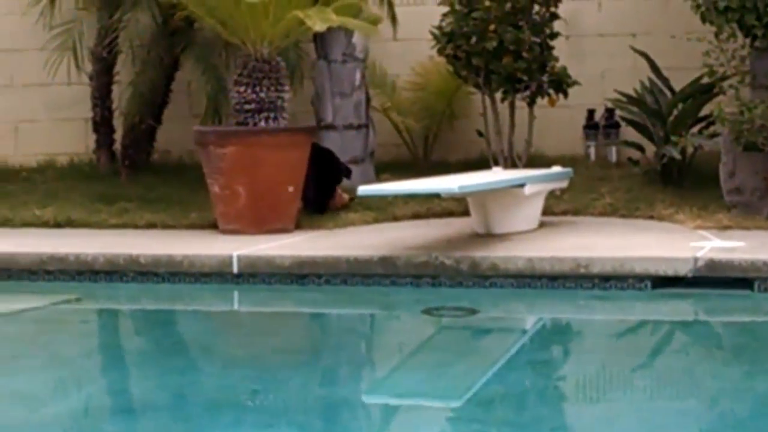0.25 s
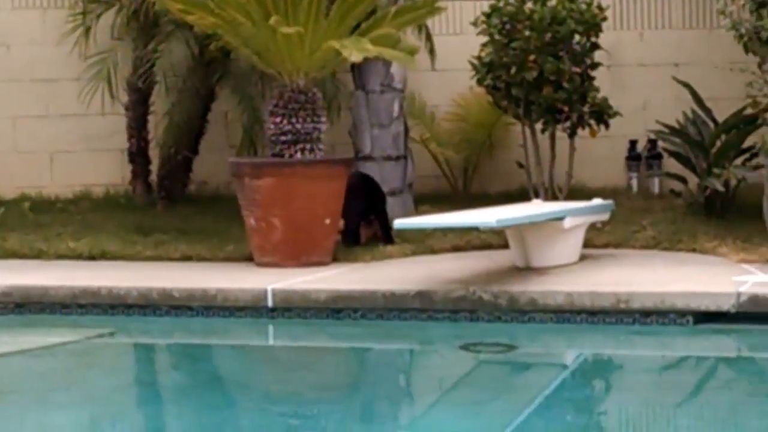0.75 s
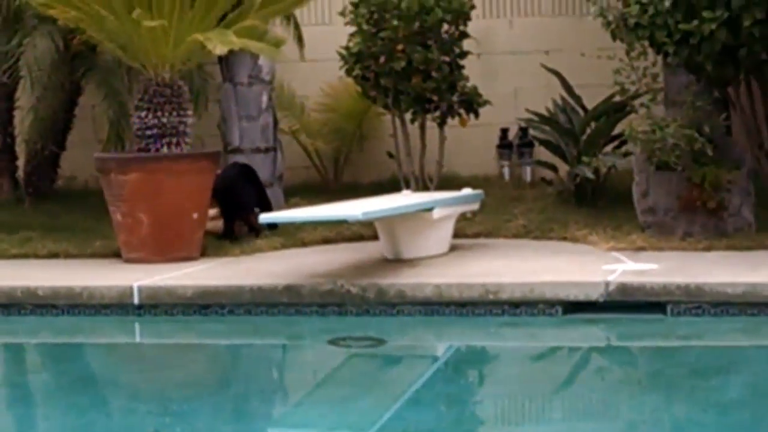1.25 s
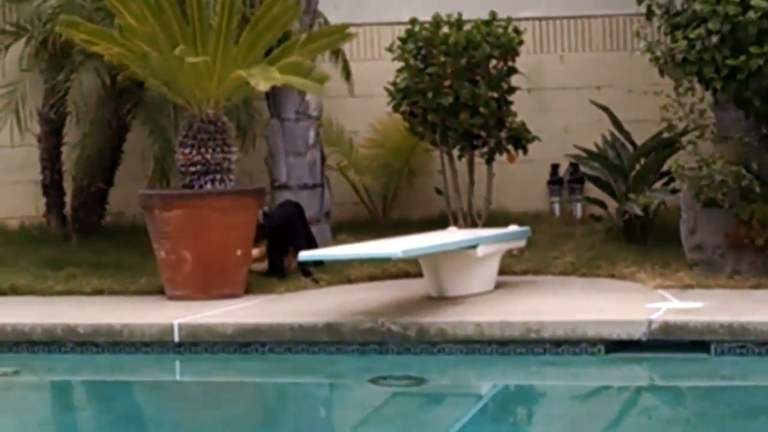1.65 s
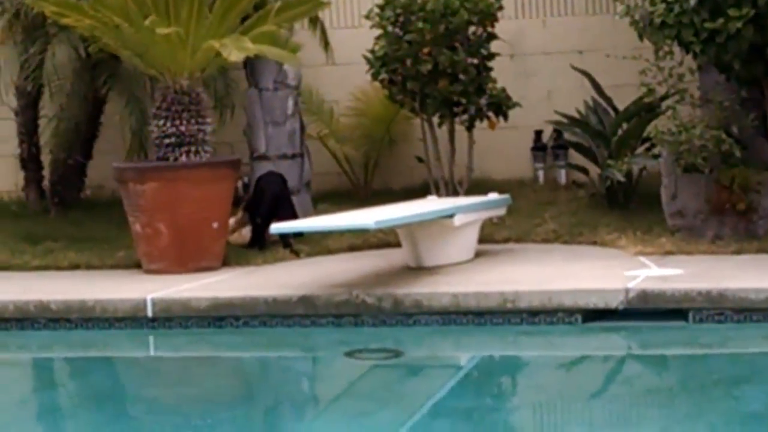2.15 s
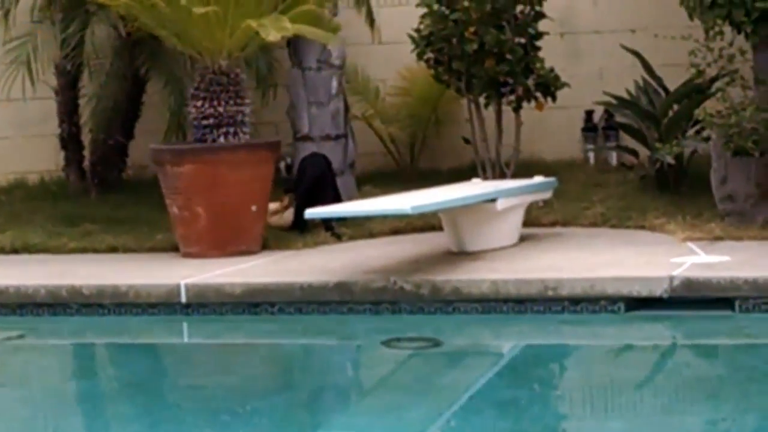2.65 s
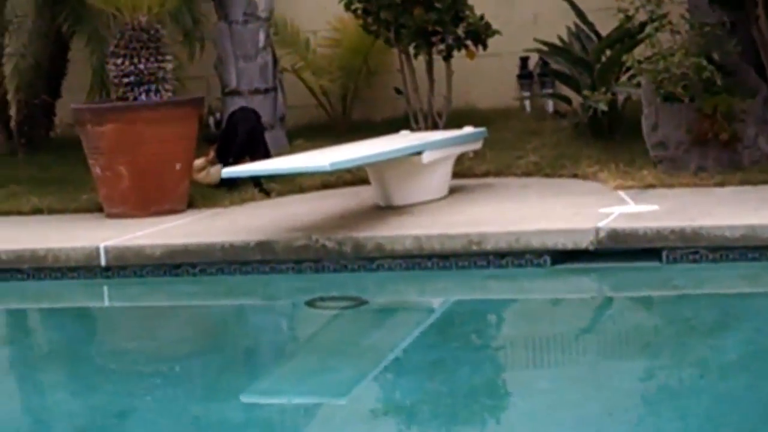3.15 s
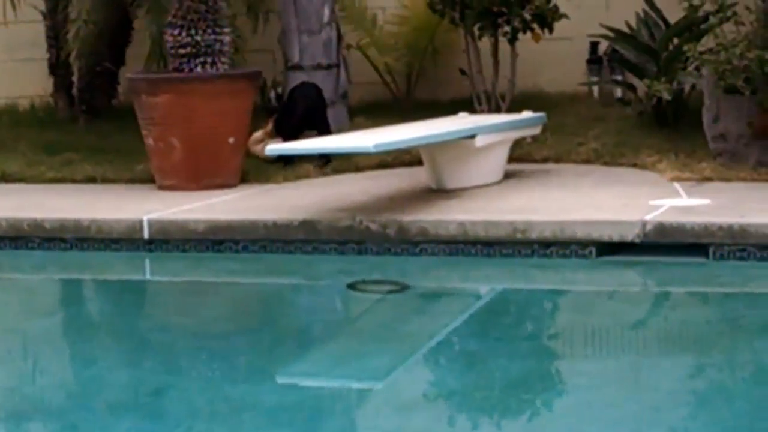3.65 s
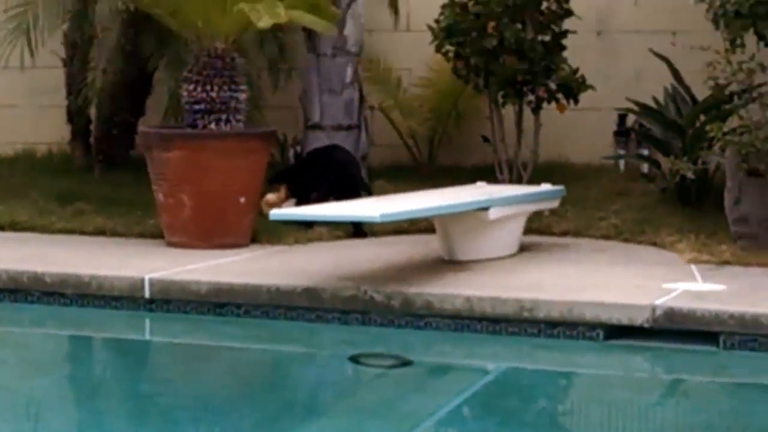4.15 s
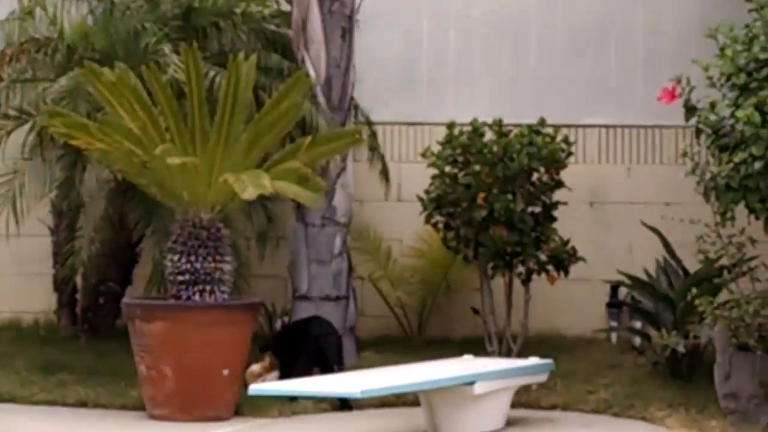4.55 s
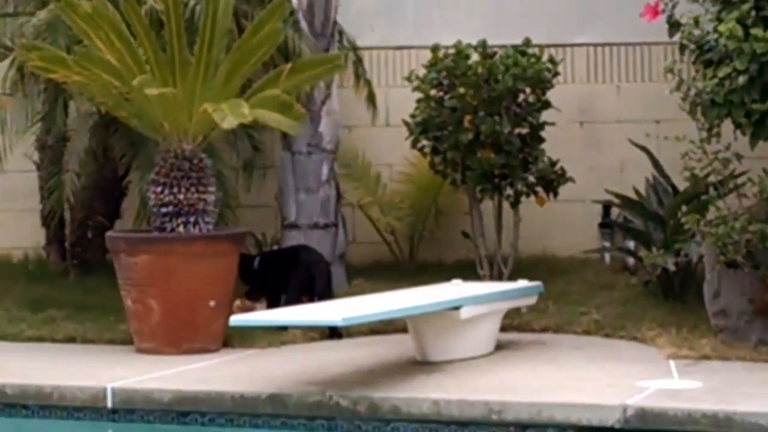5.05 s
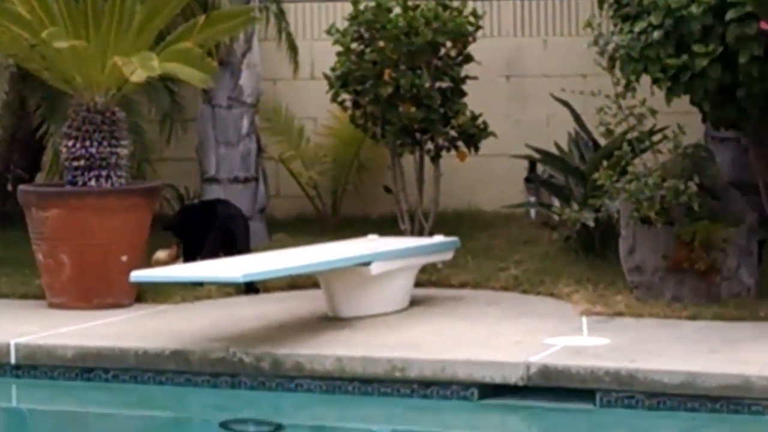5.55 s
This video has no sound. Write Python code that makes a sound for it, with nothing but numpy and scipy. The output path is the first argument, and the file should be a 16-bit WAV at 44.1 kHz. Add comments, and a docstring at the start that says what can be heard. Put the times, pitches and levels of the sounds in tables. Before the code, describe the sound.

A steady low pool pump hum with trickling, ticking water, while a propeller plane's drone slowly grows closer over a walled yard.

```python
"""A pool pump hums in a walled yard while a propeller plane drones closer overhead.
The pump is steady sines; the plane is engine orders on a sinking shaft speed, over a roar.
Water hisses, gurgles, ticks and bubbles at the skimmer, from shaped noise and short rings.
A small camera hears it through two ports and subtracts a delayed copy of each from the other."""
import sys
import numpy as np
from scipy import signal
from scipy.io import wavfile
from scipy.ndimage import uniform_filter1d

SR = 44100
rng = np.random.default_rng(int(sys.argv[2]) if len(sys.argv) > 2 else 0)


def store_wav(level_fs):
    """Save 16-bit WAV to argv[1]."""
    pcm = np.round(np.clip(np.atleast_2d(level_fs), -1, 1) * 32767)
    wavfile.write(sys.argv[1], SR, pcm.T.astype(np.int16))


N = 255339


def gain_of(db):
    """Decibels to an amplitude factor."""
    return 10 ** (np.asarray(db) / 20)


def evened(x):
    """Scales to rms 1."""
    return x / np.sqrt(np.mean(x ** 2) + 1e-20)


def read(points, hz):
    """Reads a spectrum table on a log frequency axis."""
    f, value = np.transpose(points)
    return np.interp(np.log(hz + 1), np.log(f + 1), value)


def curves(rows):
    """Every column of a time table at every sample."""
    s, *columns = np.transpose(rows)
    return [np.interp(np.arange(N) / SR, s, c) for c in columns]


def wander(seconds):
    """Smoothed random drift of rms 1."""
    size = round(seconds * SR)
    once = uniform_filter1d(rng.standard_normal(N), size=size)
    return evened(uniform_filter1d(once, size=size // 2))


def tone(turns, db, pan_db, lead_rad):
    """A sine of rms db over both ports, leaning by pan_db, the left phase ahead by lead_rad."""
    side = np.array([[.5], [-.5]])
    lean = gain_of(side * pan_db)
    lean = lean / np.sqrt((lean ** 2).mean(0))
    phase = 2 * np.pi * (turns + rng.random()) + side * lead_rad
    return np.sqrt(2) * gain_of(db) * lean * np.sin(phase)


# Likeness of noise at the two ports. Each row: frequency in Hz, correlation from -1 to 1.
PORT_LIKENESS = [(25, -0.85), (50, -0.19), (90, 0.62), (160, 0.44), (300, 0.35), (550, 0.82), (900, 0.64),
                 (1400, 0.6), (2400, 0.000085), (4000, -0.44), (6000, 0.38), (15000, -0.18)]
# Noise reaches the left port later, varying as the camera turns. Each row: time in s, lag in ms.
LEFT_LAG = [(0, 0.25), (3.3, 0.21), (5.0, 0.25), (5.79, 0.23)]


def noise(colour, size, patchy_db):
    """Random short-time spectra in drifting patches, partly alike at the two ports, rms 1."""
    hop = size // 4
    hz, frames = np.fft.rfftfreq(size, 1 / SR), N // hop + 5
    a, b, c, d, patches = rng.standard_normal((frames, len(hz), 5)).T
    patches = uniform_filter1d(patches, size=6, axis=0)
    patches = evened(uniform_filter1d(patches, size=10, axis=1))
    lag_s = np.interp(np.arange(frames) * hop / SR, *np.transpose(LEFT_LAG)) / 1000
    same = np.clip(read(PORT_LIKENESS, hz), -1, 1)[:, None]
    left = a + 1j * b
    early = left * np.exp(2j * np.pi * hz[:, None] * lag_s)
    right = same * early + np.sqrt(1 - same ** 2) * (c + 1j * d)
    z = np.array([left, right]) * gain_of(colour(hz)[:, None] + patchy_db * patches)
    return evened(signal.istft(z, nperseg=size, noverlap=3 * hop)[1][:, :N])


BUZZ_HZ, IMPELLER_HZ = 120.0, 174.45  # the buzz, at twice the 60 Hz mains, and the impeller tone
# Buzz, then impeller, swelling as the camera turns.
# Each row: mean level in dB, swing in dB, period in s, loudest moment in s.
PUMP_SWELLS = [(-51, 1, 6.7, 4.8), (-45, 3, 4.7, 4.18)]
# Left phase lead in rad of buzz and impeller.
PUMP_LEADS_RAD = [0.87, -0.43]
# Stereo lean of the two tones. Each row: time in s, left over right in dB.
BUZZ_LEAN = [(0, 13), (1.5, 11.5), (3.3, -7), (4.6, -6), (5.79, 28)]
IMPELLER_LEAN = [(0, -0.5), (0.7, 0.5), (1.75, -22), (2.5, 3), (3.6, -11), (4.4, -2), (5.79, 7)]
# Fainter hum tones of steady pitch. Each row: frequency in Hz, mean level in dB, left over right in dB.
FAINT_HUM_TONES = [(240, -65, -2), (345.6, -65, 0), (348.9, -64, -4), (360, -66, 2), (523.4, -68, 3),
                   (600, -66.5, -2), (692, -69, 0), (1037.6, -77, 0)]


def pump():
    """Magnetic buzz at twice the mains, the impeller tone, and fainter wavering hum tones."""
    t, out = np.arange(N) / SR, 0
    pitches, leans = (BUZZ_HZ, IMPELLER_HZ), (BUZZ_LEAN, IMPELLER_LEAN)
    for hz, swell, lean, lead_rad in zip(pitches, PUMP_SWELLS, leans, PUMP_LEADS_RAD):
        mean_db, swing_db, period_s, loudest_s = swell
        level_db = mean_db + swing_db * np.cos(2 * np.pi * (t - loudest_s) / period_s)
        out = out + tone(hz * t, level_db, curves(lean)[0], lead_rad)
    for hz, db, pan_db in FAINT_HUM_TONES:
        out = out + tone(hz * t, db + 0.9 * wander(0.52), pan_db, 0.19)
    return out


# Approach of the plane. Each row: time in s, nearness from 0 far to 1 near.
NEARNESS = [(0, 0.012), (2.9, 0.095), (3.4, 0.2), (4.0, 0.36), (4.3, 0.62), (4.6, 0.98), (4.9, 0.99),
            (5.79, 0.97)]


def nearness():
    """How near the plane is at every sample, 0 to 1."""
    return curves(NEARNESS)[0]


SHADOW_ORDER = 4.7  # the wall hides higher orders longer: nearness to the power order / this
AIR_WAVER_DB, AIR_WAVER_S = 1.2, .15  # moving air makes every order waver
AIR_FLUTTER_DB, AIR_FLUTTER_S, STEADY_ORDER = 0.16, .05, 9.0  # dB per order above the steady ones


def order_level_db(order, far_db, near_db, echo, period_s, faintest_s):
    """One order rises past the wall, wavers in the air and beats with its ground and wall echo."""
    t = np.arange(N) / SR
    approach_db = far_db + near_db * nearness() ** (order / SHADOW_ORDER)
    waver_db = AIR_WAVER_DB * wander(AIR_WAVER_S)
    flutter_db = AIR_FLUTTER_DB * max(order - STEADY_ORDER, 0) * wander(AIR_FLUTTER_S)
    beat = abs(1 - min(echo, .9) * np.exp(2j * np.pi * (t - faintest_s) / period_s))
    return approach_db + waver_db + flutter_db + 20 * np.log10(beat)


# Plane speed. Each row: time in s, half shaft speed in Hz (the pitch of order 1).
HALF_SHAFT = [(0, 22.99), (1.5, 23.14), (3, 22.97), (4.1, 22.82), (5, 22.75), (5.79, 22.67)]
# Order levels. Each row: order, far level in dB, gain at nearness 1 in dB, echo share (capped at 0.9),
# beat period in s, faintest moment in s.
ORDER_LEVELS = [(4, -61.5, 14.5, 0.21, 3.8, 2.3), (6, -50, 12, 0.69, 6.17, 1.1), (8, -51, 8, 0.42, 3, 3.53),
                (9, -52.5, 5, 0.51, 3.3, 0.65), (12, -59.5, -4, 0.92, 4.3, 3.63),
                (15, -59, 0, 0.38, 2.6, 3.4), (16, -56.5, 8.5, 0.51, 2.43, 0.91),
                (20, -65.5, 16.5, 0.38, 0.74, 5.24)]
# Order images, row for row with the levels. Each row: order, left over right in dB at start and end,
# left phase lead in rad at start and end.
ORDER_IMAGES = [(4, 7, 0.5, 1.2, -0.4), (6, -12, 4, 1.5, -0.8), (8, -4, 1, 1.5, -1.4), (9, 5, 3, 2, -6),
                (12, 5, 6, 0, -2), (15, -3, 1, -2.2, 3.5), (16, -9, -1, 0.6, -2.6), (20, -3, 10, -3.5, 2)]
# Faint orders following the level of the 20th. Each row: order, level in dB relative to the 20th.
FAINT_ORDERS = [(18, -9), (19, -24), (22, -16), (23, -12), (24, -13.5), (26, -18), (28, -11)]
# Roar spectrum. Each row: frequency in Hz, level in dB.
ROAR_COLOUR = [(20, -14), (50, -8), (75, -7.5), (110, -7.5), (160, -5), (220, -12), (300, -7.5),
               (550, -12.5), (900, -19.5), (1400, -26.5), (3000, -33.5)]
ROAR_DB, ROAR_NEAR_DB, ROAR_GUST_DB, ROAR_GUST_S = -47.5, 3.5, 1, 0.28


def plane():
    """Engine and propeller orders sink with the Doppler shift and cross the image; air roar under them."""
    levels_db = [order_level_db(*row) for row in ORDER_LEVELS]
    turns, way = np.cumsum(curves(HALF_SHAFT)[0]) / SR, np.linspace(0, 1, N)
    out = 0
    for (order, pan0, pan1, lead0, lead1), db in zip(ORDER_IMAGES, levels_db):
        out = out + tone(order * turns, db, pan0 + (pan1 - pan0) * way, lead0 + (lead1 - lead0) * way)
    for order, db in FAINT_ORDERS:
        out = out + tone(order * turns, levels_db[-1] + db + 1.5 * wander(0.089), 2.1, 0.94)
    roar_db = ROAR_DB + ROAR_NEAR_DB * nearness() + ROAR_GUST_DB * wander(ROAR_GUST_S)
    return out + gain_of(roar_db) * noise(lambda f: read(ROAR_COLOUR, f), size=2048, patchy_db=1.85)


# Running water. Each row: time in s, hiss level in dB.
FLOW = [(0, -58.5), (1.9, -60), (2.35, -54), (2.8, -55), (4.0, -54), (5.2, -59), (5.79, -52)]
# Hiss spectrum. Each row: frequency in Hz, level in dB.
HISS_COLOUR = [(300, -24), (900, -2.5), (1400, -1), (2100, 1), (3000, 0.5), (4300, -3), (7000, -5.5),
               (11500, -6.5), (15000, -10.5)]
# Sudden changes of the hiss that drain away.
# Each row: start in s, level over the flow in dB (negative dips), fading time in s.
SPLASHES = [(0.728, 5.5, 0.14), (1.252, 8, 0.037), (1.47, 5, 0.13), (1.6, 10, 0.057), (1.76, 8, 0.21),
            (2.13, 6.5, .03), (2.216, 3, .003), (2.33, 5, 0.12), (3.35, 2, 0.011), (3.467, -8, 0.013),
            (4.2, 3.5, 0.16), (4.765, 11, 0.11), (5.115, 14, 0.029), (5.18, 8.5, 0.052), (5.38, 13, 0.031)]


def hiss():
    """Broadband flow noise that flickers; splashes shift its level at once and drain away."""
    t = np.arange(N) / SR
    splash_db = sum(db * (t >= s) * np.exp(-abs(t - s) / fade_s) for s, db, fade_s in SPLASHES)
    quick_db = 1.9 * evened(uniform_filter1d(rng.standard_normal(N), size=600))
    level_db = curves(FLOW)[0] + splash_db + quick_db + 1.4 * wander(0.1)
    return gain_of(level_db) * noise(lambda f: read(HISS_COLOUR, f), size=256, patchy_db=1.5)


# Low and high gurgle bands. Each row: centre in Hz, width in Hz.
GURGLE_BANDS = [(2090, 410), (3450, 1540)]
# Gurgle levels. Each row: time in s, low band in dB, high band in dB.
GURGLING = [(0, -70, -55.5), (0.25, -66, -62.5), (0.45, -77, -56.5), (0.68, -62, -59), (0.8, -64, -62),
            (0.97, -64, -57.5), (1.15, -63, -64.5), (1.45, -66, -56.5), (1.6, -61, -55.5),
            (1.72, -71, -66.5), (1.8, -70, -53), (1.9, -58, -67), (2.1, -60.5, -57), (2.27, -58.5, -59.5),
            (2.45, -56, -65.5), (2.75, -61, -61.5), (3.1, -66, -70.5), (4.1, -76, -65), (4.3, -64, -70),
            (4.7, -68, -57), (4.86, -62, -59), (4.95, -64, -60), (5.22, -59.5, -71), (5.33, -61, -56.5),
            (5.47, -57, -69), (5.55, -46, -56), (5.64, -61, -73), (5.71, -50.5, -71), (5.79, -52, -63)]
GURGLE_LUMP_DB, GURGLE_LUMP_S = 1.5, 0.072


def gurgles():
    """Two resonant bands of lumpy noise where the skimmer gurgles."""
    out = 0
    for (hz, width_hz), db in zip(GURGLE_BANDS, curves(GURGLING)):
        level_db = db + GURGLE_LUMP_DB * wander(GURGLE_LUMP_S)
        band = noise(lambda f: -20 * np.log10(1 + (2 * (f - hz) / width_hz) ** 2), size=512, patchy_db=3.0)
        out = out + gain_of(level_db) * band
    return out


def breeze(db=-62, top_hz=45):
    """Lumpy air pressure on the ports, far down in the bass."""
    def colour(f):
        return -20 * np.log10(1 + (f / top_hz) ** 2 + (12 / (f + 1)) ** 2)
    return gain_of(db) * noise(colour, size=4096, patchy_db=3.5)


# A thin high tone, perhaps a far bird. The row: start in s, level in dB, frequency in Hz, length in s.
PEEP = (0.004, -58, 3195, 0.06)


def peep():
    """One short whistle of steady pitch."""
    s, db, hz, length_s = PEEP
    t = np.arange(N) / SR
    shape = np.sin(np.pi * np.clip((t - s) / length_s, 0, 1)) ** 0.28
    return shape * tone(hz * t, db, 0, 0)


def drip(hz, width_hz, length_s, crack=0.17):
    """A puff rings around hz on a wide crack: partials start nearly together, then scatter to a tail."""
    t = np.arange(2000) / SR
    jitter, phases = rng.uniform(-1.21, 1, (2, 16, 1))
    shifts = np.linspace(-1, 1, 16)[:, None] + jitter / 7
    turns = (hz + 1.4 * width_hz * shifts) * t
    partials = np.exp(-2 * shifts ** 2) * np.sin(2 * np.pi * turns + .8 * phases)
    snap = crack * np.diff(rng.standard_normal(len(t) + 1)) * np.exp(-t / min(length_s, .003))
    start = 1 - np.exp(-t / max(.0002, length_s / 6))  # longer drips start softer
    decay = np.exp(-t / length_s) + 0.073 * np.exp(-t / 0.057)
    return (partials.sum(0) / 2 + snap) * start * decay


# Loudest ticks and drips. Each row: start in s, level in dB, centre in Hz, width setting in Hz,
# decay time in s.
DROPS = [(0.7268, -34, 4300, 1480, 0.0012), (0.7295, -41, 4400, 700, 0.0046),
         (0.7375, -43, 4200, 810, 0.003), (1.388, -45.5, 3850, 596, 0.0092),
         (1.474, -44, 13930, 1910, 0.006), (1.7505, -33, 8900, 890, 0.0017),
         (1.626, -44, 13900, 900, 0.002), (2.126, -46, 14200, 900, 0.004), (2.127, -55, 3700, 452, 0.012),
         (2.2162, -31, 13800, 1300, 0.0009), (2.217, -44, 8000, 3050, 0.00066),
         (2.2202, -37, 14300, 1200, 0.0015), (2.228, -48, 14300, 1200, 0.0012),
         (2.335, -45, 13800, 2240, 0.017), (2.72, -43, 2750, 362, 0.0042), (2.823, -56, 3800, 720, 0.0039),
         (2.866, -45, 9400, 880, 0.0028), (3.223, -35.5, 14110, 1384, 0.003),
         (3.293, -45, 9510, 528, 0.0026), (3.353, -49, 3880, 448, 0.007),
         (3.468, -41.5, 9470, 1000, 0.0028), (3.469, -41, 2980, 500, 0.0057),
         (3.47, -51, 5950, 1500, 0.004), (3.814, -42, 14000, 1392, 0.003), (4.197, -40, 4300, 1310, 0.004),
         (4.262, -44.5, 990, 120, 0.013), (4.265, -47, 3980, 500, 0.008), (4.574, -36.5, 2130, 530, 0.0027),
         (4.68, -49.5, 1780, 60, 0.016), (4.843, -37, 3960, 300, 0.014), (5.149, -37, 4840, 870, 0.0058),
         (5.183, -38, 13600, 2500, 0.004), (5.383, -50, 10300, 1220, 0.0037),
         (5.418, -59, 2100, 362, 0.0031), (5.45, -53, 2740, 520, 0.0034), (5.522, -48, 2150, 200, 0.015),
         (5.523, -52, 1530, 80.6, 0.015)]


def drops(per_s=45, small_db=-66, spread_db=5.0, left_db=-4):
    """Loud drops among many small ones; each is weaker at the left port and up to 11 samples late."""
    chance = rng.random((round(per_s * N / SR), 4))
    small = [(N / SR * u, small_db - spread_db * np.log(v + 0.0012), 650 * 22 ** w, 500,
              0.00038 + 0.0015 * z) for u, v, w, z in chance]
    out = np.zeros((2, N + 2100))
    for s, db, hz, width_hz, length_s in list(DROPS) + small:
        at, sound = round(s * SR), gain_of(db) * drip(hz, width_hz, length_s)
        late = at + rng.integers(0, 12)
        out[1, at:at + len(sound)] += sound
        out[0, late:late + len(sound)] += gain_of(left_db) * sound
    return out[:, :N]


# Large bubbles. Each row: start in s, level in dB, upper pitch in Hz, a third of the duration in s.
BUBBLES = [(0.355, -44.5, 665, 0.014), (0.769, -50.5, 915, 0.012), (0.937, -52, 1013, 0.008),
           (1.314, -55, 320, 0.037), (2.676, -56, 1400, 0.013), (3.116, -54.5, 1590, 0.014),
           (3.467, -53, 717, 0.017), (4.745, -53, 1012, 0.017), (4.956, -46, 397, 0.029),
           (5.507, -48, 1000, 0.0088)]


def bubbles(per_s=30, small_db=-64, spread_db=3):
    """Air pockets swell and burst, two near pitches beating; a few large ones among many small."""
    out, t = np.zeros(N + 4000), np.arange(4000) / SR
    chance = rng.random((round(per_s * N / SR), 4))
    small = [(N / SR * u, small_db - spread_db * np.log(v + 0.043), 600 * 3.5 ** w,
              0.0033 + 0.0077 * z) for u, v, w, z in chance]
    for s, db, hz, third_s in list(BUBBLES) + small:
        shape = np.sin(np.pi * np.clip(t / (3 * third_s), 0, 1) ** 0.74)
        ring = np.sin(2 * np.pi * hz * t) + .5 * np.sin(2 * np.pi * hz * 0.96 * t)
        out[round(s * SR):][:len(t)] += gain_of(db) * shape * ring
    return out[:N] * np.ones((2, 1))


def scene():
    """Everything as it reaches the two ports."""
    return pump() + plane() + hiss() + gurgles() + breeze() + peep() + drops() + bubbles()


def roll_off(x):
    """The treble ends steeply here."""
    return signal.sosfilt(signal.butter(12, 15660, fs=SR, output="sos"), x)


# The body colours the left port's treble. Each row: frequency in Hz, gain in dB.
LEFT_PORT = [(4000, 0), (6500, 3), (9000, -0.5), (14000, 0.5)]
# Cross-subtraction. Each row: frequency in Hz, share of the other port before depth and unevenness.
CROSS_SHARE = [(300, 0), (600, .4), (1200, .8), (2400, .95), (3900, .8), (5200, .5), (6500, .45),
               (7800, .45), (10400, .46), (13000, .67), (14300, .5)]
# Thinned bands in the hiss. Each row: time in s, depth factor, centre of the lowest band in Hz.
THINNED_BANDS = [(0, 1.0, 2480), (0.2, 1.08, 2470), (0.6, 1.0, 2530), (1.3, 1.06, 2500), (1.6, 0.95, 2480),
                 (1.9, 1.02, 2500), (2.15, 0.85, 2580), (2.35, 1.0, 2620), (2.55, 0.9, 2600),
                 (2.85, 0.9, 2560), (3.05, 1.0, 2460), (3.3, 1.08, 2570), (3.5, 0.97, 2500),
                 (3.75, 1.08, 2500), (4.15, 1.08, 2350), (4.3, 1.02, 2560), (4.6, 0.95, 2480),
                 (4.83, 1.1, 2580), (4.93, 1.08, 2400), (5.05, 0.9, 2450), (5.19, 1.1, 2580),
                 (5.35, 0.9, 2620), (5.79, 0.95, 2640)]
CROSS_SAMPLES = 17
UNEVEN_SHARE, UNEVEN_RAD = .24, .32  # random unevenness in depth and place of the thinned bands
SLIDE_REACH_HZ, WIDENING = 800, 2.6  # reach of the lowest band's slide; it widens as it deepens
TOP_HZ = 15700


def record(dry):
    """The body colours the left port; above the bass each side loses a delayed copy of the other."""
    hz, t, z = signal.stft(dry, SR, nperseg=512, noverlap=384)
    z = z * np.array([gain_of(read(LEFT_PORT, hz)), np.ones(len(hz))])[..., None]
    uneven = rng.standard_normal((z.shape[2], len(hz), 2)).T
    uneven = uniform_filter1d(uniform_filter1d(uneven, size=20, axis=1), size=18, axis=2)
    depth, place = evened(uneven[0]), evened(uneven[1])
    s, factor, centre = np.transpose(THINNED_BANDS)
    factor_now = np.interp(t, s, factor)
    f = hz[:, None]
    first_hz = SR / CROSS_SAMPLES  # lowest thinned band of the plain delay
    off_hz = f - np.interp(t, s, centre)
    narrow = np.clip(1 - WIDENING * (factor_now - factor.min()), .2, 1)
    # extra phase turns move the lowest band to its centre
    slide = np.exp(-(off_hz / SLIDE_REACH_HZ) ** 2) * (1 + (narrow * off_hz - f) / first_hz)
    calm = 1 - .5 * np.exp(-((f - first_hz) / SLIDE_REACH_HZ) ** 2)  # less uneven near the lowest
    share = np.clip(read(CROSS_SHARE, hz)[:, None] * (factor_now + UNEVEN_SHARE * calm * depth), 0, 1)
    cross = share * np.exp(-2j * np.pi * (f / first_hz + slide) + 1j * UNEVEN_RAD * calm * place)
    widened = (z - cross * z[::-1]) * (f < TOP_HZ)
    mix = signal.istft(widened, nperseg=512, noverlap=384)[1][:, :N]
    return roll_off(mix)


dry = scene()
out = record(dry)
store_wav(out)
```